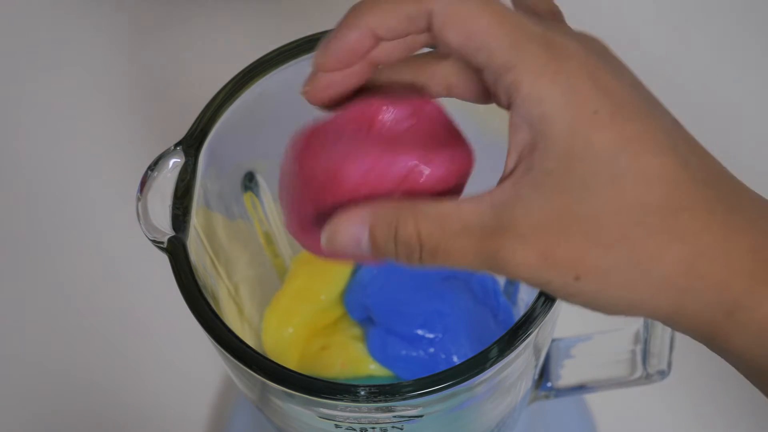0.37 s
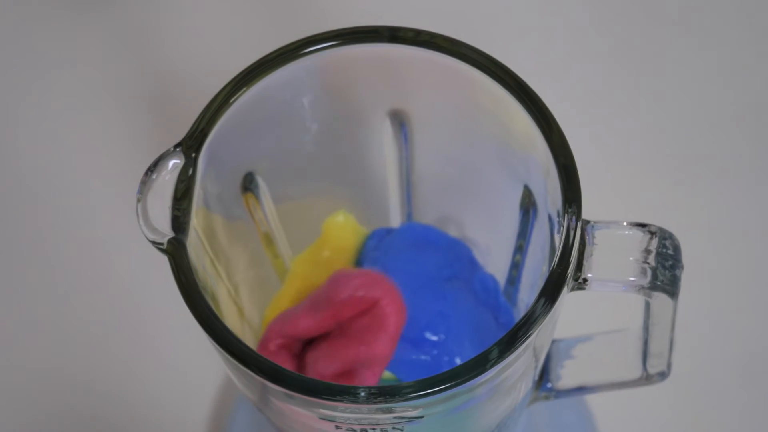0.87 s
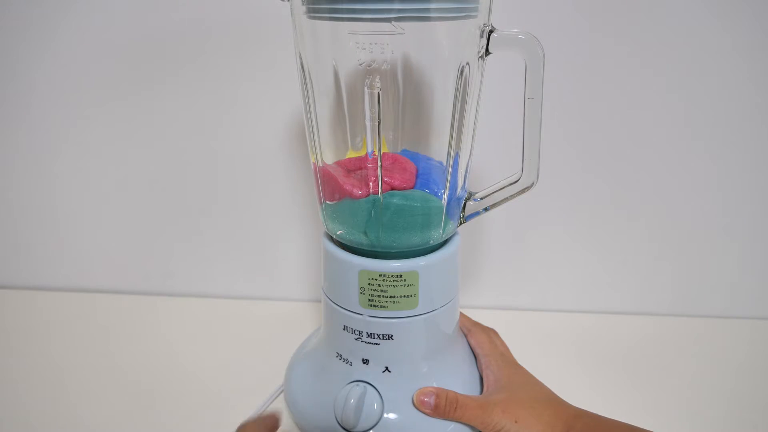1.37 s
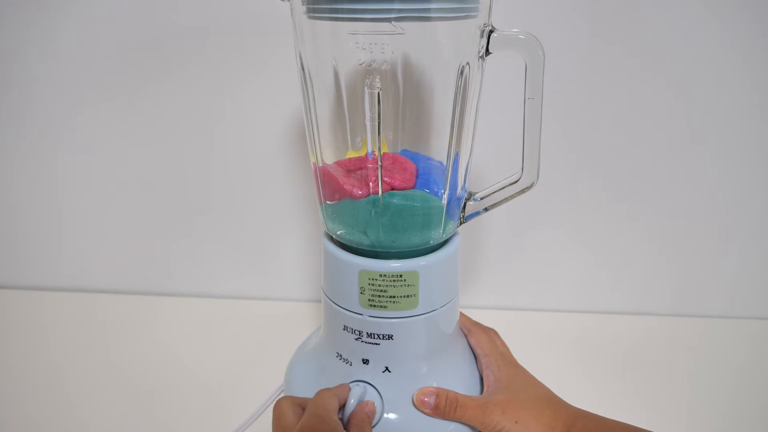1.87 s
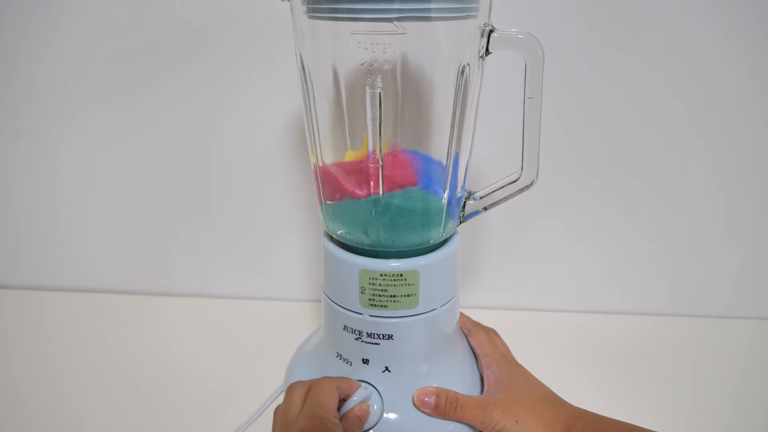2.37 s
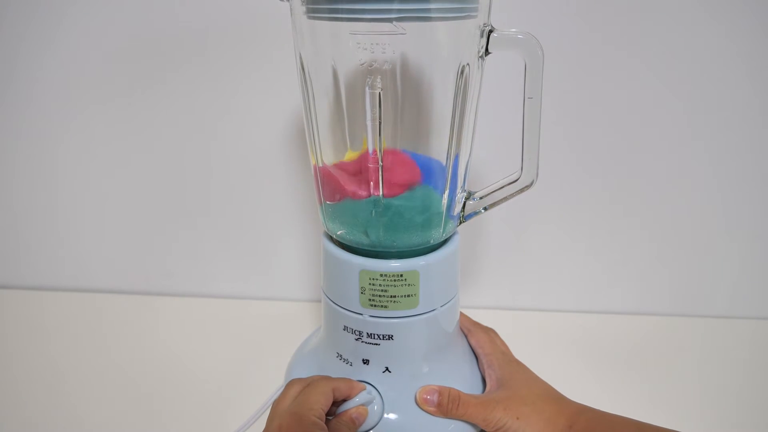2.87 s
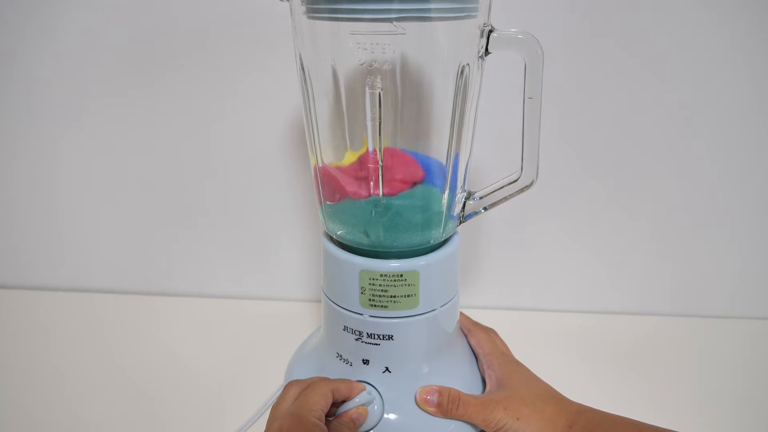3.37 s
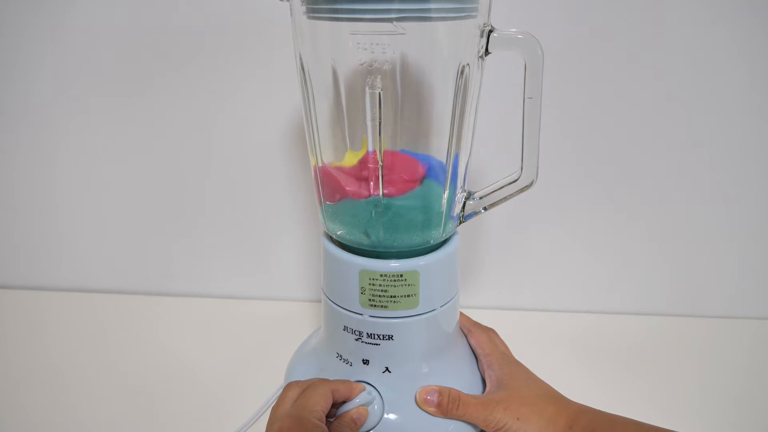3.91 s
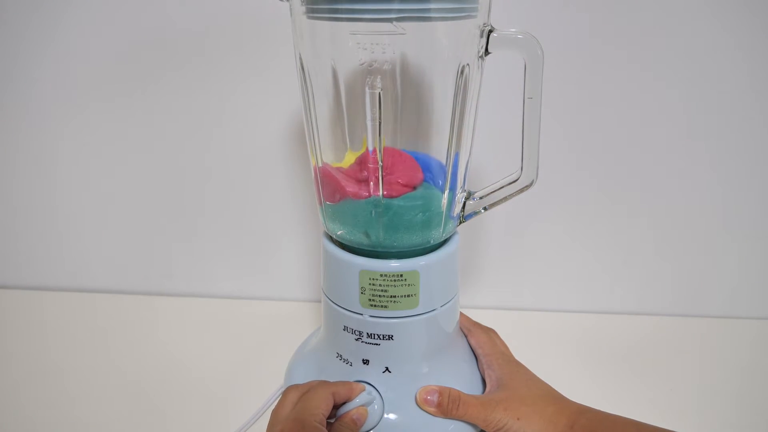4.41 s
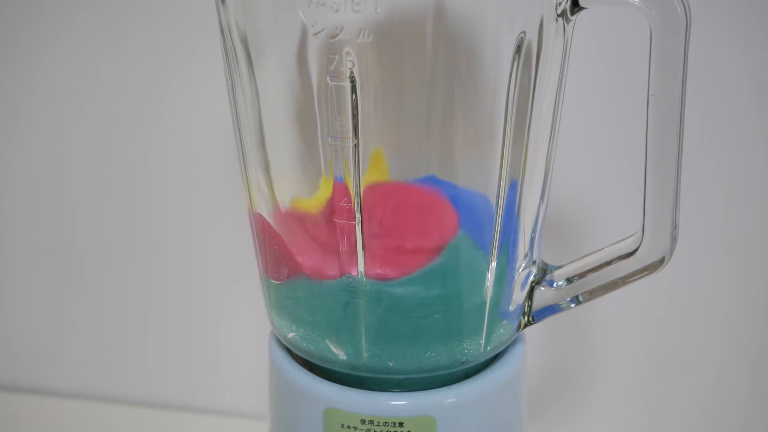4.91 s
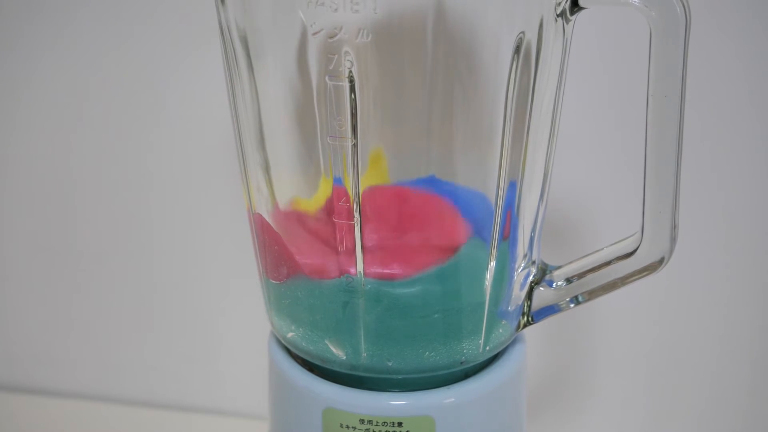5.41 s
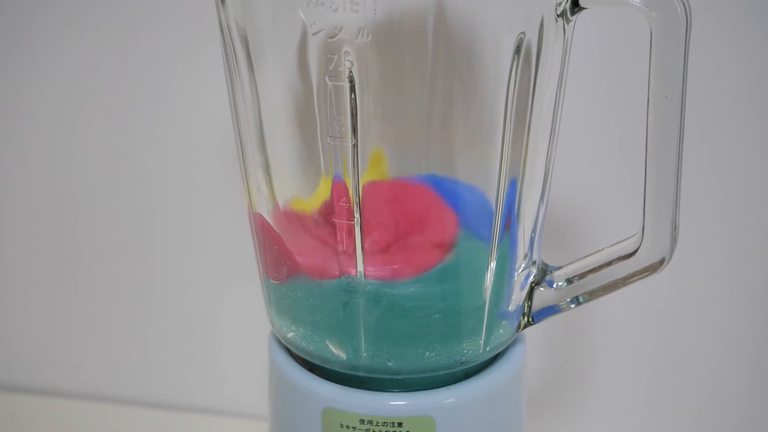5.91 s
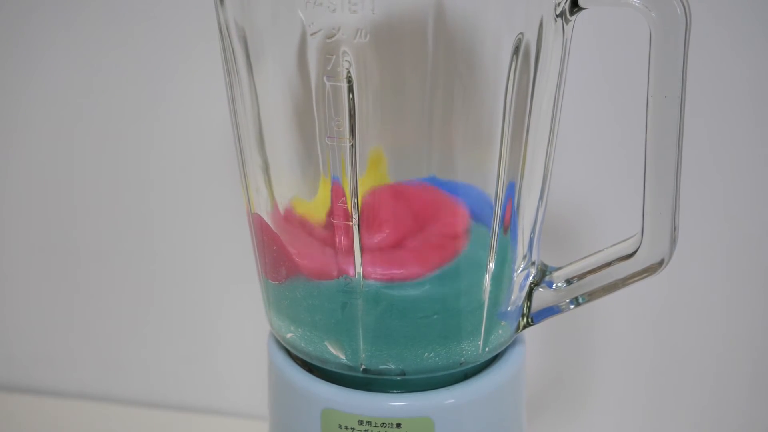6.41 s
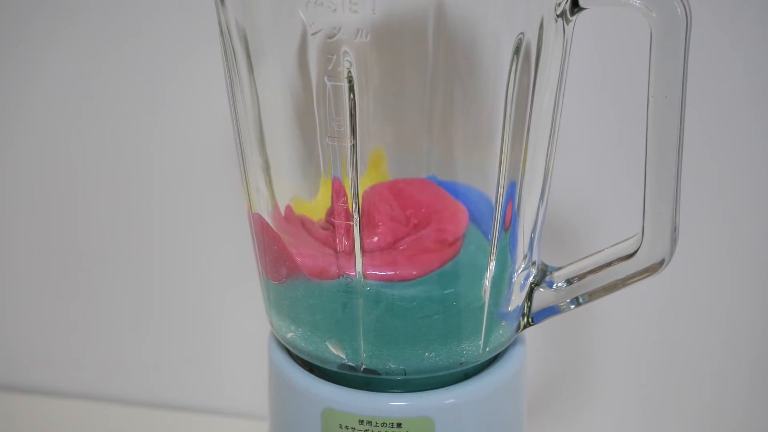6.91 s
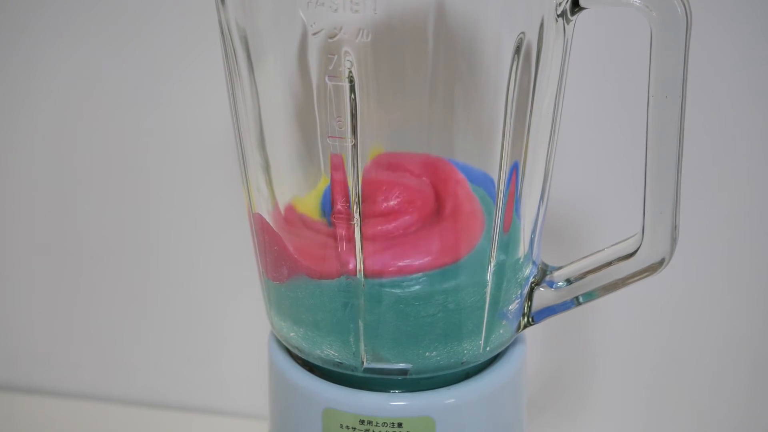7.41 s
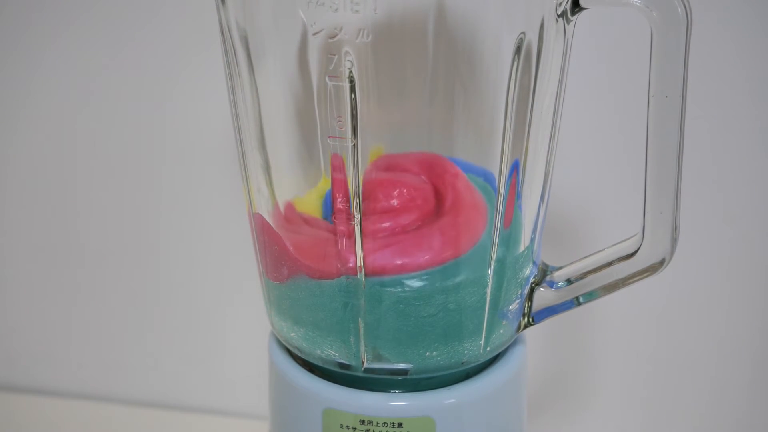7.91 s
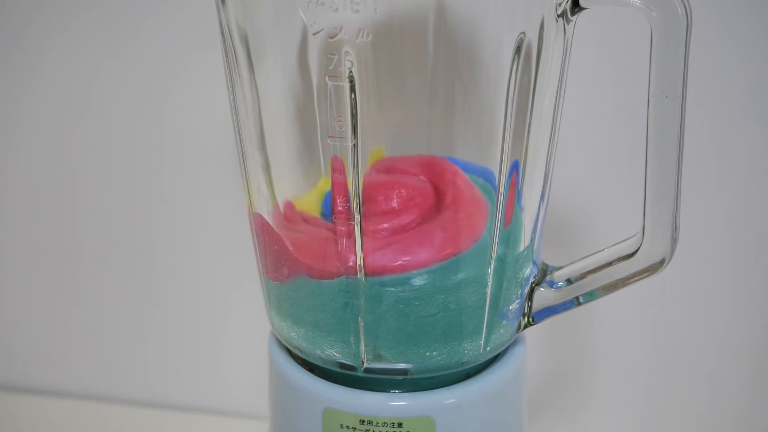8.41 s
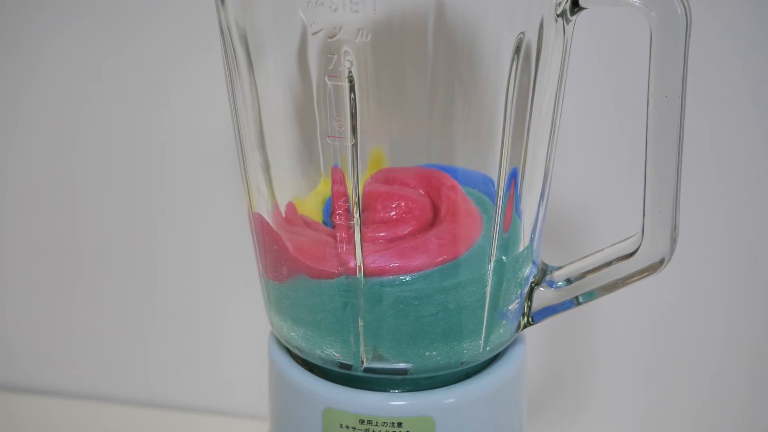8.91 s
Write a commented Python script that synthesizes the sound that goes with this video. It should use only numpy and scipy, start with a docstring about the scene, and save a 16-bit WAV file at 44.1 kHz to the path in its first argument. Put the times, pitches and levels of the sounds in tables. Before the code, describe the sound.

In a quiet room close to a stereo microphone, a slime lump lands with small sticky ticks and a hollow soft plop in a glass jar. Faint dial clicks follow, then a hard snap starts a blender motor, labouring with a low rattling growl. It stops, runs again after a short gap, stops, then starts a third time, revving up brighter and faster before cutting off into faint room hiss.

```python
"""A quiet room: a glass-jar blender on a table, close to a small stereo microphone.
A lump of slime ticks and slumps into the jar, a hand finds the dial, then the motor runs three times,
labouring far below its free speed: sines carry the mains ripple and the slow shaft beat in the base,
pulsed noise through resonances is the drive rattling the casing, coloured noise is the brush hiss.
Wall echoes, microphone hiss and a low background murmur lie behind it."""
import sys
import numpy as np
from scipy import signal
from scipy.fft import rfft, irfft, next_fast_len
from scipy.io import wavfile
from scipy.ndimage import uniform_filter1d

SR = 44100
rng = np.random.default_rng(int(sys.argv[2]) if len(sys.argv) > 2 else 0)


def volts_from_decibels(level):
    """Turn decibel levels (scalar or array-like) into linear amplitude factors."""
    exponent = np.asarray(level, float) / 20
    return 10 ** exponent


def output_pcm(signal):
    """Save a mono or channel-first signal as 16-bit PCM at the path in sys.argv[1].

    Samples are clipped to [-1, 1] before scaling.
    """
    pcm = np.clip(np.atleast_2d(signal).T, -1, 1) * 32767
    wavfile.write(sys.argv[1], SR, np.round(pcm).astype(np.int16))


N = 398663
T = np.arange(N) / SR

# motor runs: (current on [s], current off [s], rattle gain [dB], brush hiss gain over the rattle [dB],
# lowest ripple tone gain [dB]), the gains as they stand at slow speed
RUNS = [(2.435, 4.339, -24.5, -14.5, -47.5), (4.799, 6.693, -25, -13, -37),
        (7.095, 8.585, -25.5, -12.5, -38)]
# shaft speed, creeping up as the slime gives way and breaking free in the last run:
# (time [s], speed [turns/s])
SHAFT = [(2.44, 27), (3.2, 38.7), (4.4, 39), (4.81, 30.6), (5.8, 38.5), (6.8, 40), (7.1, 29), (7.35, 47),
         (7.65, 63), (8.0, 74), (8.25, 81), (8.6, 79)]
# base and jar resonances: (frequency [Hz], width [Hz], relative level in the first run [dB],
# in the second run [dB], at speed [dB])
CASING = [(269.3, 79.4, -3.5, -6.5, -17), (381.4, 109.6, 2.5, 1.5, 0), (507, 188, -4, -4.5, -5.5),
          (780, 147, -8.5, -8, -6.5), (1123, 290, -9, -9, -5), (1553, 262, -8, -7.5, -0.5),
          (2153, 134, -8, -13, -4.5), (2414, 237, -14, -16.5, -8.5), (3015, 283, -19, -17, -13),
          (3514, 255, -15.5, -15.5, -10), (155, 150, -21, -20.5, -15.5)]
# the level of all near sounds and their echoes dips briefly between two runs: (start [s], end [s], gain [dB])
DIP = (4.777, 4.803, -20)


def motor():
    """Torque ripple hums and beats with the shaft, the drive shakes the casing, the brushes hiss."""
    # ripple tones: (multiple of the ripple, relative level when slow [dB], when fast [dB])
    ripple_tones = [(2, -5.5, -10), (3, -3, -14), (4, -8, -24), (5, -11.5, -18), (8, -16.5, -16)]
    # tones at a sum: (ripple multiple, shaft multiple, relative level when slow [dB], when fast [dB])
    beat_tones = [(1, 1, -20, -12), (2, 1, -4.5, -4.5), (3, 1, 1, 0), (4, 1, -14.5, -11), (2, 2, -10, -0.5),
                  (3, 2, -8.5, -27), (0, 2, -31, -14), (1, 2, -18.5, -11.5), (4, 2, -19, -18)]
    # colour of the brush hiss: (frequency [Hz], density before the share in shape() [dB per Hz])
    brush_colour = [(1760, -10), (3000, -33.5), (3510, -2.5), (3920, -7), (4660, -15), (5920, -13),
                    (9850, -10.5), (12000, -20.5), (13300, -19.5), (15000, -31), (15500, -19)]
    # brush holder rings: (frequency [Hz], width [Hz], relative level [dB])
    holder_rings = [(9800, 120, -15), (12900, 500, -14)]
    ripple_hz = 120.1

    shaft = curve(SHAFT, T)[0] * (1 + 0.013 * walk(12))
    fast = np.clip((shaft - 42) / 35, 0, 1)  # 0 labouring, 1 at speed
    turn = 2 * np.pi * np.cumsum(shaft) / SR
    mains = 2 * np.pi * ripple_hz * T
    rattle_gain, hiss_gain, low_gain, ripple_gain, beat_gain = controls(fast)

    def tone(phase, db, waver_db):
        """The load on the blades makes every tone waver in level and phase."""
        wavering_phase = phase + 0.07 * waver_db * walk(30) + rng.uniform(0, 2 * np.pi)
        return volts_from_decibels(db + waver_db * walk(20)) * np.sin(wavering_phase)

    ripple = sum(tone(k * mains, slow + fast * (quick - slow), waver_db=1.06)
                 for k, slow, quick in ripple_tones)
    beats = sum(tone(k * mains + m * turn, slow + fast * (quick - slow), waver_db=3.5)
                for k, m, slow, quick in beat_tones)
    lowest = tone(mains, 5.8, waver_db=1.5)
    tones = ripple_gain * ripple + beat_gain * beats + low_gain * lowest

    # the coupling chatters: noise pushed by each torque pulse and each turn, with sharper knocks
    cycle_db = 1.2 * np.sin(mains) + 1.5 * np.sin(turn)
    push = volts_from_decibels(cycle_db + 1.14 * walk(45) + 0.85 * walk(200))
    knocks = (rng.random(N) < 120 / SR) * volts_from_decibels(7.8 * rng.random(N)) * 4.6  # about 120 a second
    drive = push * rng.standard_normal(N) + knocks
    first, second, speed = (modes(drive, CASING, column) for column in range(2, 5))
    later = (1 - fast) * second + fast * speed * volts_from_decibels(-7)
    body = np.where(T < DIP[0], first, later)

    hiss = shape(1.5 * drive + 0.61 * rng.standard_normal(N), [(1500, -46.5)] + list(brush_colour))
    hiss = level(hiss + modes(hiss, holder_rings), 0.66)
    return tones + rattle_gain * level(body, 4.95) + hiss_gain * hiss


def controls(fast):
    """Gains of rattle, hiss, lowest tone, ripple and beats follow the switch times and the speed."""
    ripple_db, beat_db = -20.5, -25
    pickup_beat_db = 0.0519  # beats grow while the shaft gains speed: dB per (turn/s each second)
    fast_rattle_db, fast_hiss_db, fast_low_db = 6.5, -3, -18  # change at full speed
    # the first jolt: beats start strong, rattle starts weak
    jolt_s, jolt_beat_db, jolt_rattle_db = 0.033, 9.5, -3
    # the lowest tone surges before it settles
    surge_s, surge_db, settle_s = 0.084, -41.5, 0.37
    # current off: the rattle drops at once, the hiss holds a moment, then both fade steadily
    cut_db, cut_s, hiss_hold_s, fade_db_per_s = -4, 0.01, 0.011, 137.5

    gains = np.zeros((5, N))
    speed_gain = np.gradient(curve(SHAFT, T)[0]) * SR
    pickup = np.maximum(uniform_filter1d(speed_gain, size=4000), 0)
    for on, off, rattle_db, hiss_db, low_db in RUNS:
        since, after = np.maximum(T - on, 0), np.maximum(T - off, 0)
        jolt = np.exp(-since / jolt_s)
        rattle_db = rattle_db + fast_rattle_db * fast
        cut = cut_db * (1 - np.exp(-after / cut_s))
        rattle = rattle_db + jolt_rattle_db * jolt + cut - fade_db_per_s * after
        hiss_fade = fade_db_per_s * np.maximum(after - hiss_hold_s, 0)
        hiss = rattle_db + hiss_db + fast_hiss_db * fast - hiss_fade
        # the hum of the base builds up over the first cycles and rings out when the current stops
        live = (1 - np.exp(-since / 0.034)) * np.exp(-after / 0.02)
        surge = since / surge_s * np.exp(1 - since / surge_s)
        settled = volts_from_decibels(low_db + fast_low_db * fast) * (1 - np.exp(-since / settle_s))
        low = volts_from_decibels(surge_db) * surge ** 2 + settled
        beat = volts_from_decibels(beat_db + jolt_beat_db * jolt + pickup_beat_db * pickup)
        gains += (T > on) * np.array([volts_from_decibels(rattle), volts_from_decibels(hiss), live * low, live * volts_from_decibels(ripple_db), live * beat])
    return gains


def dial():
    """Each move cracks, rattles switch and knob, thumps the base softly and rings a thin spring."""
    # dial touched or nudged: (time [s], switch crack peak [dB], base thump over it [dB],
    # knob ring over it [dB])
    touches = [(1.757, -43.5, 12, 12.5), (1.799, -45.5, 12, 8), (2.004, -49, 0.5, -10),
               (2.403, -49, 4, -10), (4.767, -41, 11.5, 8), (7.059, -40, 2.5, -6), (8.943, -57, 21, -25),
               (9.015, -47, 1, -12)]
    # dial snapped over: (time [s], switch crack peak [dB], base thump over it [dB],
    # spring ring over it [dB])
    snaps = [(2.439, -11, -1.5, -11), (4.34, -19, -11, -6.5), (4.804, -15, -1, -21),
             (4.809, -14.5, -4, -11.5), (6.698, -24, -15, -18), (7.0968, -8, -30, -1),
             (8.577, -16, -12, -32)]
    # switch resonances, passed twice: (frequency [Hz], width [Hz], relative level in each pass [dB])
    switch_modes = [(1400, 500, 2), (2210, 500, -4)]
    # knob resonances: (frequency [Hz], width [Hz], relative level [dB])
    knob_modes = [(2210, 150, -2), (3150, 200, 2), (3350, 260, 0), (4600, 700, -15), (6600, 500, -20)]
    touch_ring_db, snap_knob_db = -23, -2
    spring_hz, spring_t60 = 9600, 0.018  # T60 in seconds

    out, t = np.zeros(N), T[:SR // 3]
    rise, tail = 1 - np.exp(-t / 0.00038), volts_from_decibels(-60 * t / 0.2)
    moves = [(s, db, thump_db, touch_ring_db, knob_db) for s, db, thump_db, knob_db in touches]
    moves += [(s, db, thump_db, ring_db, snap_knob_db) for s, db, thump_db, ring_db in snaps]
    for s, db, thump_db, ring_db, knob_db in moves:
        crack, push = rng.standard_normal((2, len(t))) * rise
        crack = crack * (np.exp(-t / 0.0015) + 0.15 * tail)
        switch = modes(modes(crack, switch_modes), switch_modes)
        knob = modes(resonate(crack, 3200, 3000), knob_modes)
        thump = modes(push * (np.exp(-t / 0.0024) + 0.48 * tail), CASING[:3])
        spring = rise * np.sin(2 * np.pi * spring_hz * t) * volts_from_decibels(-60 * t / spring_t60)
        ring = spring + 0.33 * resonate(crack, spring_hz, 5000)
        parts = peak(switch) + volts_from_decibels(knob_db) * peak(knob)
        parts = parts + volts_from_decibels(thump_db) * peak(thump) + volts_from_decibels(ring_db) * peak(ring)
        add(out, s - 0.001, volts_from_decibels(db) * parts)  # starts 1 ms ahead of the listed time
    return out


def slime():
    """Slime peels off in sticky bright ticks; the landing lump rings the air in the open jar."""
    # slime peeling off the fingers and settling: (time [s], tick peak [dB])
    ticks = [(0.4544, -51.5), (0.4814, -46), (0.5876, -41), (0.608, -42), (0.6419, -43), (0.6544, -36),
             (0.6632, -28.5), (0.6914, -47), (0.732, -40), (0.7811, -40), (0.817, -46), (0.8374, -47)]
    # air in the jar: (frequency [Hz], width [Hz], relative level [dB])
    jar_air = [(635, 41, 2.5), (742, 64, 0.5), (275, 110, -11.5)]
    # the lump enters the mouth, lands and slumps
    enter_s, land_s, land_db = 0.585, 0.6634, -28.5
    slump_db, slump_db_per_s, enter_db_per_s = -43.5, 104, 200

    out, t = np.zeros(N), T[:SR // 4]
    for s, db in ticks:
        wet = rng.standard_normal(len(t)) * (np.exp(-t / 0.0024) + 0.11 * np.exp(-t / 0.072))
        tick = resonate(wet, 10000, 4000) + 0.5 * resonate(wet, 4100, 2500) + 1.1 * resonate(wet, 1660, 1200)
        add(out, s, volts_from_decibels(db) * peak(tick))
    landing = modes(rng.standard_normal(len(t)) * np.exp(-t / 0.0048), jar_air)
    add(out, land_s, volts_from_decibels(land_db) * peak(landing))
    # rises until the landing, falls away after it
    away_db = np.maximum(slump_db_per_s * (T - land_s), enter_db_per_s * (land_s - T))
    stir = (T > enter_s) * volts_from_decibels(slump_db - away_db + 5.1 * walk(37.9)) * rng.standard_normal(N)
    steady = modes(rng.standard_normal(SR), jar_air)  # steady noise sets the reference level
    return out + modes(stir, jar_air) / np.std(steady)


def quiet():
    """Noise makes the microphone hiss and a low murmur alike on both sides; a faint sine passes once."""
    # colour of the hiss: (frequency [Hz], density before the share in shape() [dB per Hz])
    hiss_colour = [(24, -68), (40, -27), (129, -23), (438, -15.5), (998, -14), (1080, -8), (1960, -12),
                   (2990, -11), (3220, -13.5), (4460, -13.5), (15500, -18.5)]
    # murmur bands: (frequency [Hz], width [Hz], relative level [dB])
    murmur_bands = [(130, 45, 5), (279, 71, -5.5), (392, 62, -6.5), (850, 410, -10)]
    # low background murmur, stepping to new levels: (time [s], level [dB])
    murmur_level = [(1.22, -64), (1.27, -59), (4.7, -59), (6.95, -64), (7.08, -59), (8.85, -61.5),
                    (9.0, -62)]
    # faint passing tone: (start [s], end [s], frequency [Hz], peak [dB])
    faint_tone = (2.17, 2.4, 792, -65)

    hiss = level(shape(rng.standard_normal((2, N)), hiss_colour), -64)
    murmur = sum(volts_from_decibels(db + 1.6 * walk(3.4)) * resonate(rng.standard_normal(N), hz, width)
                 for hz, width, db in murmur_bands)
    start, end, hz, db = faint_tone
    swell = np.sin(np.pi * np.clip((T - start) / (end - start), 0, 1))
    faint = volts_from_decibels(db) * swell * np.sin(2 * np.pi * hz * T)
    return hiss + level(murmur, -0.082) * volts_from_decibels(curve(murmur_level, T)[0]) + faint


def level(x, db):
    """Set the rms level."""
    return x * volts_from_decibels(db) / np.sqrt(np.mean(x ** 2))


def curve(rows, at):
    """Columns of a table read at given places."""
    first, *columns = np.transpose(rows)
    return [np.interp(at, first, c) for c in columns]


def shape(x, points, share=0.86):
    """Colour by (Hz, dB) points, each dB value multiplied by the share."""
    size = next_fast_len(x.shape[-1])
    hz = np.maximum(np.arange(size // 2 + 1) * SR / size, 1)
    db = np.interp(np.log(hz), np.log(np.array(points)[:, 0]), np.array(points)[:, 1])
    return irfft(rfft(x, size) * volts_from_decibels(share * db), size)[..., :x.shape[-1]]


def resonate(x, hz, width):
    """Two-pole resonance, gain 1 at the centre."""
    return signal.lfilter(*signal.iirpeak(hz, hz / width, SR), x)


def modes(x, table, column=2):
    """A set of resonances; neighbours in opposite sign."""
    return sum((-1) ** k * volts_from_decibels(row[column]) * resonate(x, row[0], row[1]) for k, row in enumerate(table))


def walk(rate):
    """Random levels held 1 / rate s and slewed twice."""
    k = int(SR / rate)
    held = np.repeat(rng.standard_normal(N // k + 1), k)
    return 0.95 * uniform_filter1d(uniform_filter1d(held, k), k)[:N]


def peak(x):
    """Scale to a peak of one."""
    return x / np.abs(x).max()


def add(out, s, sound):
    """Mix a short sound in at time s."""
    i = int(s * SR)
    out[i:i + len(sound)] += sound[:N - i]


def scene():
    """Blender close by, a little to the right, with wall echoes that differ left and right."""
    # thin rings of the jar and its seat: (frequency [Hz], width [Hz], relative level [dB])
    glass = [(363, 5.5, -1), (1410, 4, -1), (2170, 5, -4), (3300, 6, 2)]
    # colour of the wall echoes: (frequency [Hz], level before the share in shape() [dB])
    echo_colour = [(60, -3), (110, -24), (200, -32), (380, -31.5), (700, -15.5), (1290, -12), (2380, -15),
                   (4400, -9.5), (8120, -10), (15000, -4.5)]
    # left against right, before the share given to each side: (frequency [Hz], level [dB])
    side_colour = [(60, -12), (110, -0.5), (200, -0.5), (380, -0.5), (700, -0.5), (1290, -4), (2380, -3),
                   (4400, -0.5), (8120, 0), (15000, -2)]
    room_t60, room_db, ring_out_db = 0.3, 2.5, 2.5  # T60 in seconds

    near = motor() + dial()
    # the thin rings stand out once the current is off
    stopped = sum((T > off) * (T < off + 0.36) * (1 - np.exp(-np.maximum(T - off, 0) / 0.02))
                  for on, off, *_ in RUNS)
    near = near + modes(near, glass) * volts_from_decibels(ring_out_db * stopped) + slime()

    t = T[:SR // 2]
    echoes = rng.standard_normal((2, len(t))) * volts_from_decibels(-60 * t / room_t60) * (t > 0.003)
    echoes = shape(echoes / np.sqrt(np.sum(echoes ** 2, axis=1, keepdims=True)), echo_colour)
    wet = signal.fftconvolve(near[None], echoes, axes=1)[:, :N]

    start, end, dip_db = DIP
    dip = uniform_filter1d(np.where((T > start) & (T < end), volts_from_decibels(dip_db), 1), size=100)
    direct = np.array([shape(near, side_colour, 0.63), shape(near, side_colour, -0.076)])
    return (direct + volts_from_decibels(room_db) * wet) * dip + quiet()


def roll_off(x):
    """The treble ends steeply here."""
    return signal.sosfilt(signal.butter(12, 16460, fs=SR, output="sos"), x)


def record(dry):
    """The microphone drops the deep bass and the very top."""
    bass_cut = signal.butter(2, 100, "high", fs=SR, output="sos")
    top_cut = signal.ellip(8, 0.2, 60, 15150, fs=SR, output="sos")
    mix = signal.sosfilt(np.vstack([bass_cut, top_cut]), dry)
    return roll_off(mix)


dry = scene()
out = record(dry)
output_pcm(out)
```